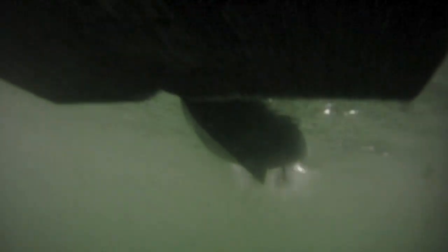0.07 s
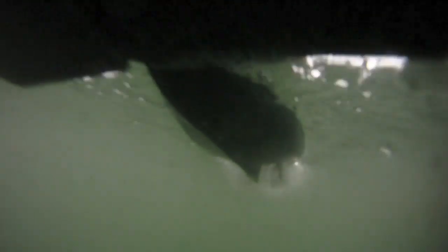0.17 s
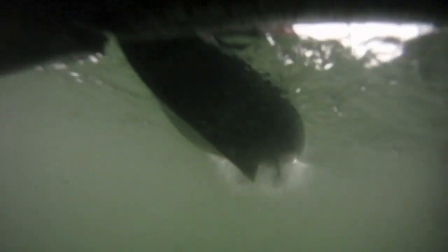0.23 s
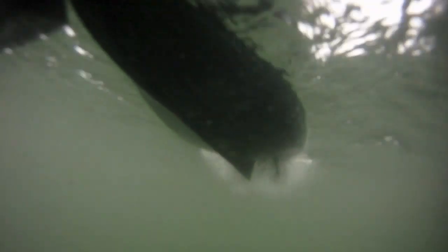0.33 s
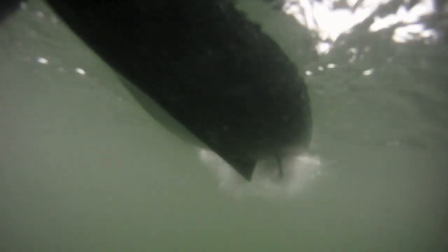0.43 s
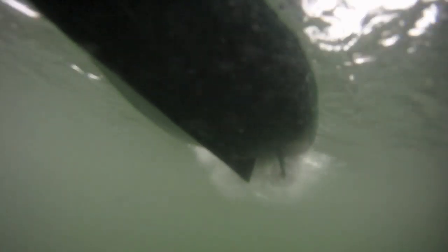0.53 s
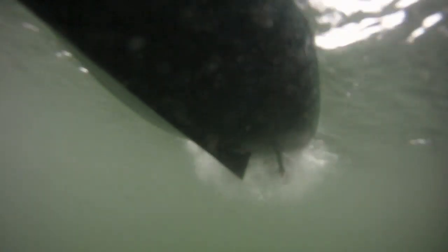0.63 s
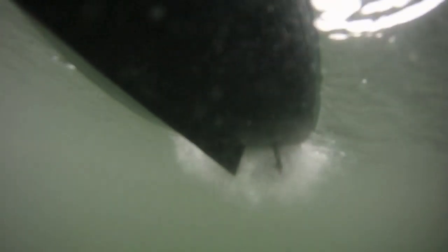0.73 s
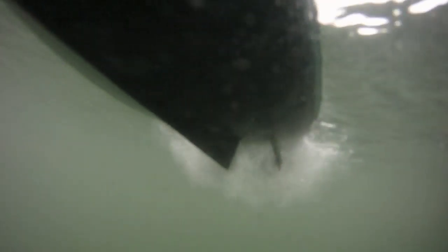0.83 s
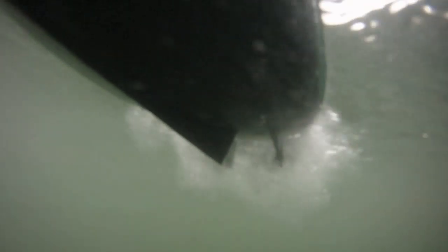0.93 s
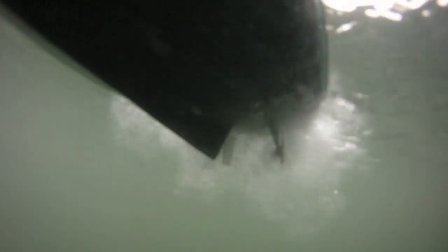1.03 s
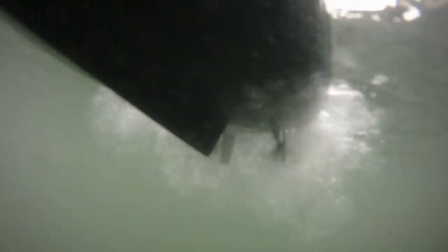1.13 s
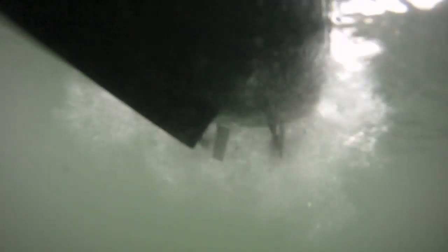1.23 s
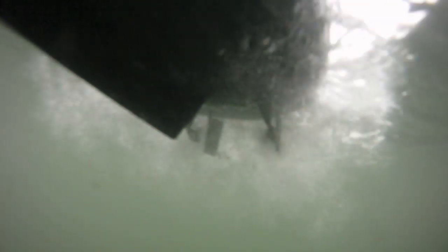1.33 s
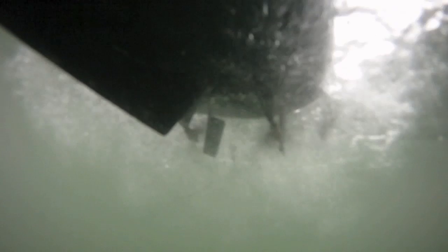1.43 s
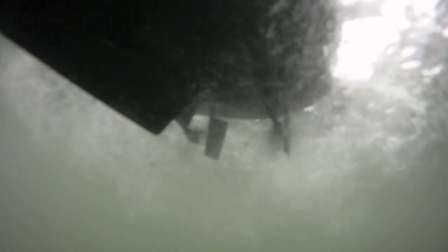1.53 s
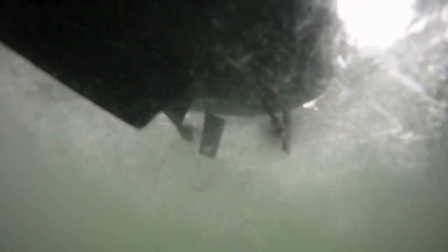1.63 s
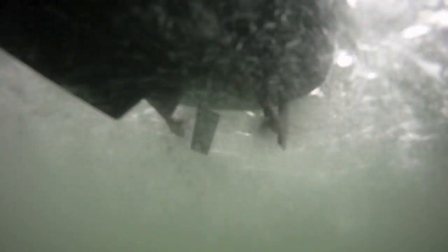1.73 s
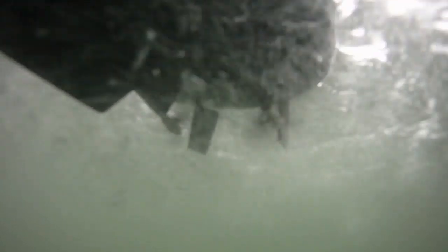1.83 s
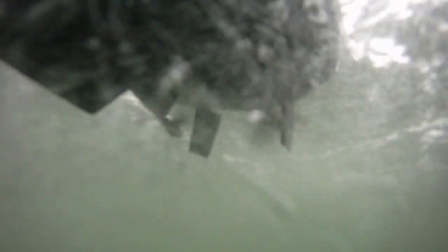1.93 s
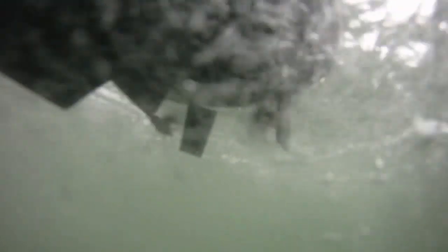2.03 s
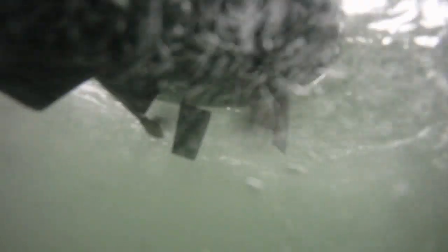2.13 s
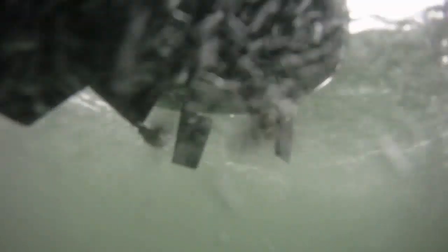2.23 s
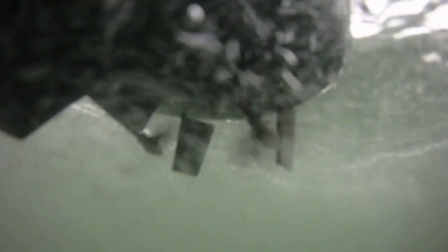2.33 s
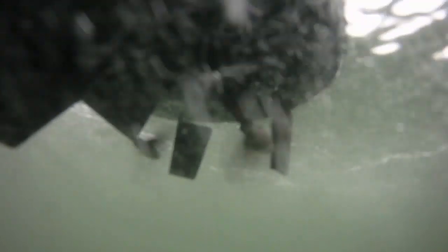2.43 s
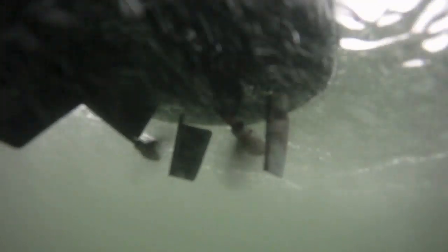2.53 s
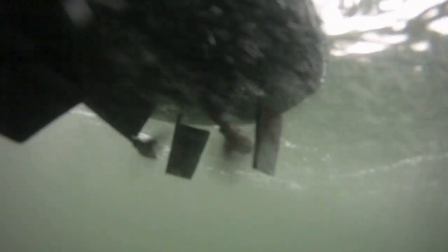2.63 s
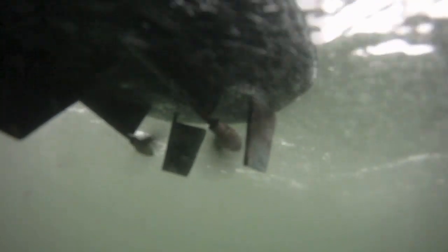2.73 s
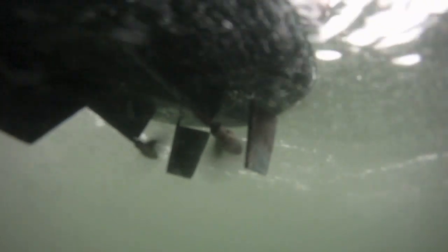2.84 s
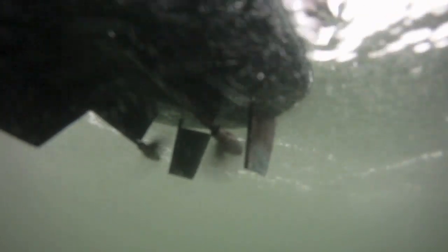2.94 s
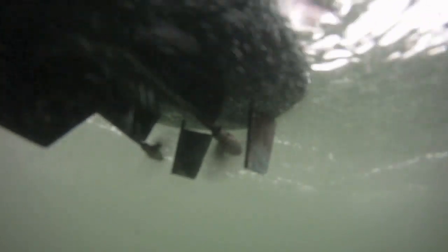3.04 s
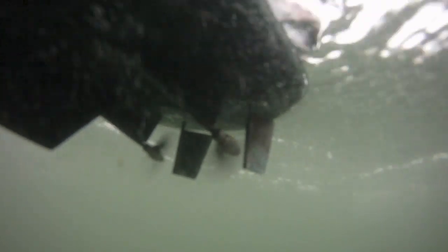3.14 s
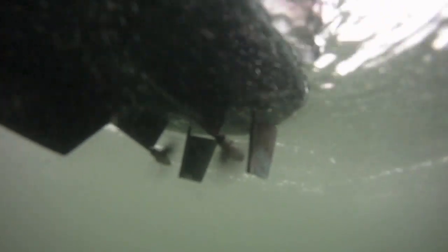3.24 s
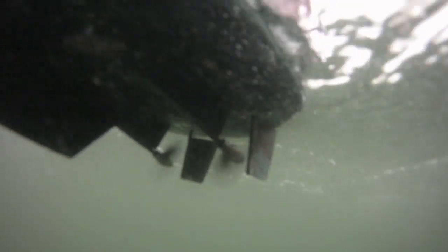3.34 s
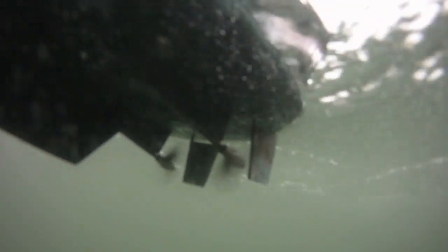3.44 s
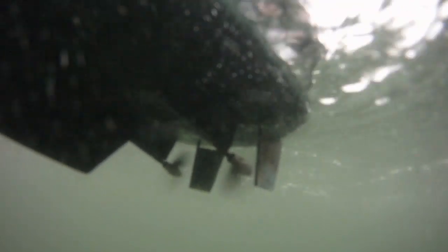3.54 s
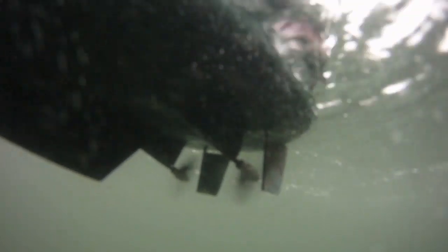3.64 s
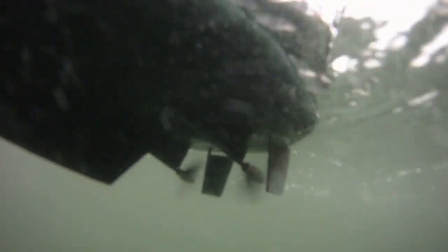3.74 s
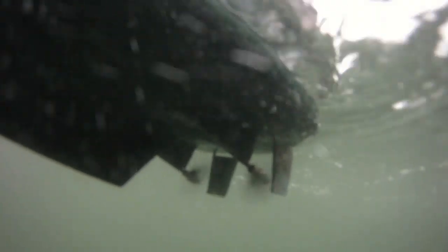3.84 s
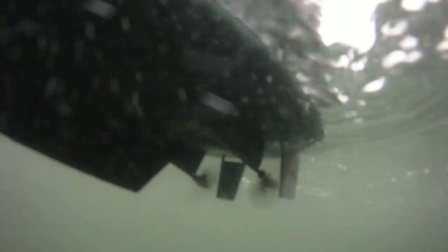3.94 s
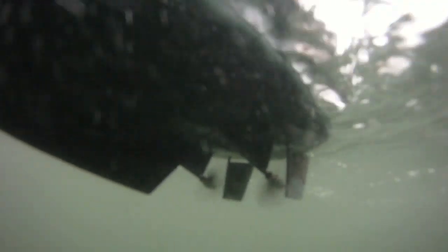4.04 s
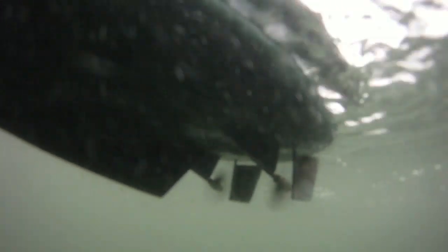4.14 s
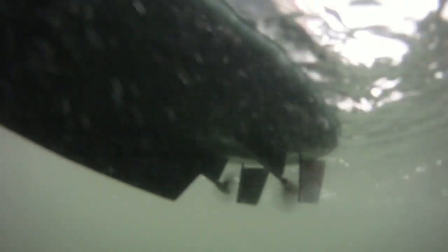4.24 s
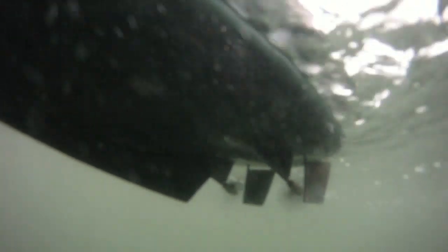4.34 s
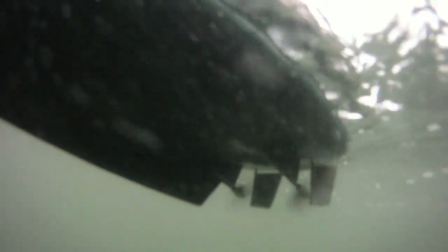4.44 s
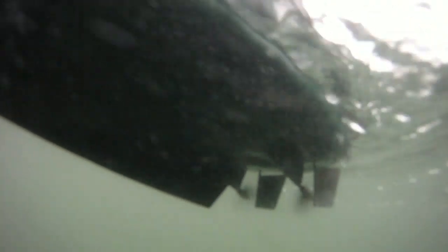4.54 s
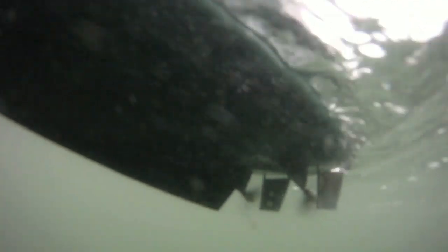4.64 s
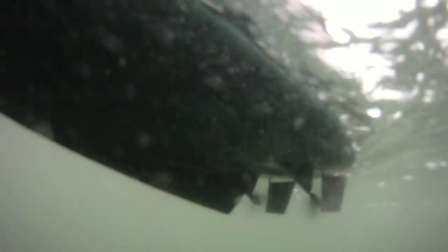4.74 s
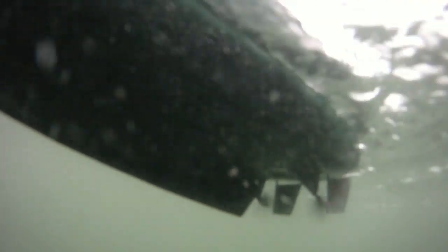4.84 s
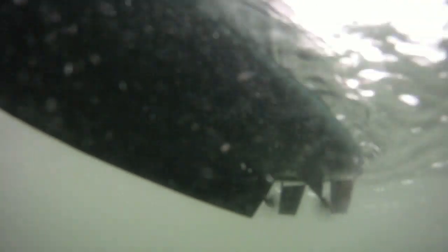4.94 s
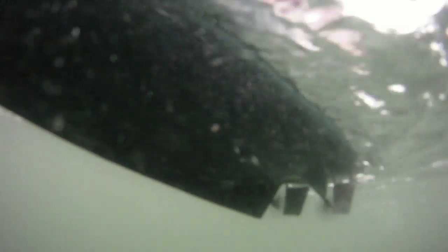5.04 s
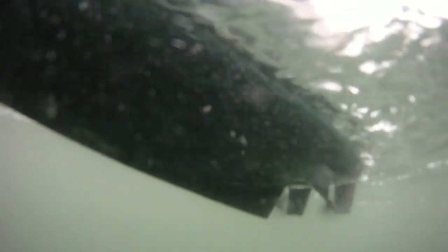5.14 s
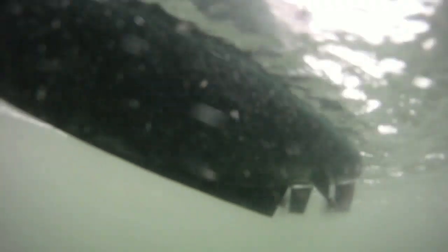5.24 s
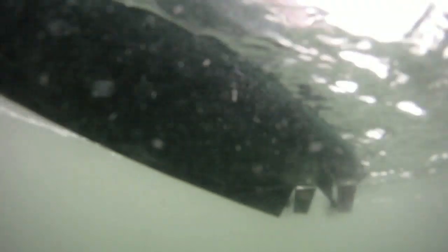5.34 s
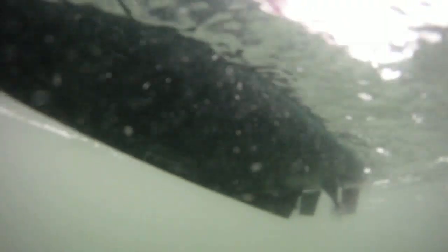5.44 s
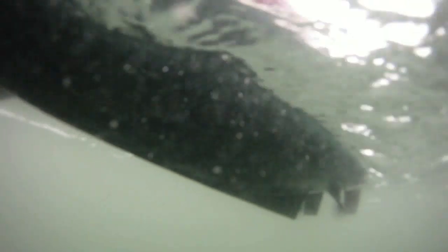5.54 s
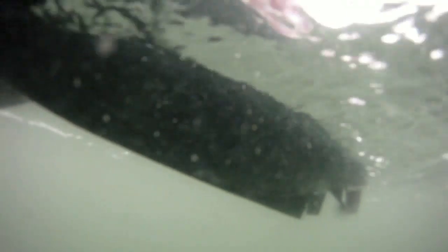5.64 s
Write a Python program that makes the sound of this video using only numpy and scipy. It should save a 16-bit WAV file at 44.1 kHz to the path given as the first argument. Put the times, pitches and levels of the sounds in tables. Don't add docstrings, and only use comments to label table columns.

```python
import sys
import numpy as np
from scipy import signal
from scipy.fft import rfft, irfft, next_fast_len
from scipy.io import wavfile
from scipy.ndimage import uniform_filter1d

SR = 44100
rng = np.random.default_rng(int(sys.argv[2]) if len(sys.argv) > 2 else 0)


def generate_wav(sig):
    pcm = np.round(np.clip(np.atleast_2d(sig).T, -1, 1) * 32767).astype(np.int16)
    wavfile.write(sys.argv[1], SR, pcm)


def to_linear_factor(level_db):
    exponent = np.asarray(level_db, float) / 20
    return 10 ** exponent


N = 250488
TIME = np.arange(N) / SR

# time in seconds, left turns per second, right turns per second.
SHAFT_SPEEDS = [(0.0, 28.798, 23.947), (0.4, 28.496, 24.144), (0.8, 28.154, 24.347), (1.2, 27.766, 24.449),
                (1.6, 27.328, 24.2), (2.0, 26.927, 23.941), (2.4, 26.72, 23.877), (2.8, 26.745, 23.894),
                (3.2, 26.856, 23.879), (3.6, 26.958, 23.901), (4.0, 27.005, 23.938), (4.4, 26.976, 23.868),
                (4.8, 26.942, 23.764), (5.2, 26.929, 23.79), (5.68, 26.941, 23.918)]
# frequency in Hz, density in dB per Hz.
GURGLE_COLOUR = [(90, -43), (140, -12), (330, 1.5), (750, -3), (1100, 1), (1400, -3.5), (1800, -31)]
RUSH_COLOUR = [(1200, -39), (1450, -14), (1600, 0.5), (1900, 4), (2600, -3), (3500, -12), (4300, -23),
               (5000, -47)]
FIZZ_COLOUR = [(3000, -7), (4000, 3), (4600, 2.5), (5100, -6.5), (5500, -17), (5900, -28)]
# frequency in Hz, width in Hz, level in dB.
LEFT_HULL_MODES = [(164, 27, -2), (220.8, 29.6, 4), (281, 40, -9.5), (383, 33, -17.5)]
RIGHT_HULL_MODES = [(234, 77, 0), (317, 49, -5.5), (366, 40, -2), (493.7, 60, 3), (662, 36, -2)]
# time in seconds, peak in dB, frequency in Hz.
GEAR_SLAPS = [(0.8534, -23.5, 2200), (1.4197, -9.5, 2210), (1.4716, -7.5, 2155), (1.5948, -8, 2260),
              (1.6646, -3, 2210), (1.721, -5.5, 2250), (1.8098, -0.5, 2360), (1.9001, -2, 2370),
              (1.9345, 1, 2330), (1.9659, 1.5, 2240), (2.0547, 0, 2156), (2.0921, -5, 2187),
              (2.2523, -1, 2197), (2.3401, -4.5, 2219), (2.3955, -6.5, 2300), (2.4653, -3.5, 2134),
              (2.5212, -5.5, 2290), (2.6469, -7.5, 2330), (3.6954, -24, 2070)]
# frequency in Hz, width in Hz, level in dB.
COUPLING_MODES = [(2070, 220, 7), (2660, 590, -8)]
DRONE_TONES_HZ = 137.1, 193
# time in seconds, nearness of the screws in dB, froth round them in dB,
# hull flank turned to the housing in dB, wake reaching it in dB.
BOAT_PASS = [(0, -37, -36, -10, -11.5), (0.251, -31, -36, -14, -6), (.5, -27, -31, -13, -7.5),
             (.8, -21, -32, -2, -8.5), (1.1, -19, -30, 0.5, -6), (1.301, -16, -25, 2, -3),
             (1.45, -6.5, -26.5, 0.5, -2.5), (1.78, -1.5, -17, -1, 0), (1.95, -5, -10.5, -10, -4.5),
             (2.302, -.5, -3.5, -12, -3.5), (2.65, -3, -4.5, -7, -5), (2.85, -10, -8, -13, -3.5),
             (3.201, -14.5, -11.5, -8.5, -6), (3.6, -22, -14.5, -8, -8), (4.2, -25, -17.5, -5, -8),
             (4.852, -29, -25.5, -5, -9), (5.301, -32, -30, -9, -16), (5.68, -25.5, -32.5, -13.5, -17.5)]
LAYER_FOLLOWS = {"left knock": (-27, 0.05, 0.08, 1.01, -0.08), "left mesh": (-22, 0.47, 0.28, -0.01, 0.07),
                 "ring": (-36, 0.54, 0.93, 0.45, -0.4), "second": (-34, 0.8, -0.1, -0.15, 0.63),
                 "fourth": (-56, 0.3, 1.5, 0.5, 0.5), "right knock": (-28, -0.05, 0.1, 0.19, 0.83),
                 "whine": (-15.5, 1.01, 0.06, -0.02, -0.03), "right mesh": (-38, -0.03, 0.34, 0.33, 0.5),
                 "tick": (-34.5, .6, -0.1, 0.2, 0.06), "gurgle": (-26.5, 0.04, 0.05, 0.04, 0.93),
                 "rush": (-22.5, 0.36, .35, 0.11, 0.21), "fizz": (-34, -0.25, 1.13, 0.18, 0.14),
                 "finest": (-52.5, -.5, 1.2, 0.3, .01), "sway": (-48, -.1, -0.08, -0.12, .6),
                 "hum": (-52, 0, -0.3, .3, 0.7), "growl": (-46, .01, 0.1, 3, 0),
                 "low note": (-40.5, 0.2, 0.4, .3, -0.5), "high note": (-39, 0.3, 0.1, -0.3, .5),
                 "grind": (-80, .01, .01, .01, .01)}
LAYER_SPELLS = {"growl": [(-.4, 0.62, -37), (.5, 1.3, -42.5), (4.7, 5.9, -55)], "low note": [(-.4, .5, -32),
                (.45, 1.16, -36)], "high note": [(-.4, 0.48, -35.5), (.45, 1.23, -40)],
                "second": [(.7, 1.6, -48)], "left mesh": [(.35, 2.2, -43), (1.51, 2.01, -31.5)],
                "tick": [(.25, 1.3, -45.5)], "right knock": [(2.2, 3.1, -40)], "ring": [(.2, .9, -55.5),
                (.7, 1.5, -53), (1.6, 1.84, -40.5), (2.0, 2.5, -36), (2.54, 2.72, -35.5),
                (2.65, 3.4, -43.5), (4.7, 6, -61.5)], "hum": [(.75, 1.35, -42), (1.4, 2.05, -38.5),
                (4.35, 5.4, -43.5)], "fizz": [(1.5, 1.68, -56), (1.83, 1.98, -44), (2.18, 2.36, -51),
                (2.36, 2.66, -40)], "right mesh": [(1.4, 1.95, -35), (2.05, 2.45, -36.5), (2.9, 5.0, -43)],
                "fourth": [(-.1, 1.4, -68), (2.18, 2.45, -49)], "finest": [(4.4, 6, -76),
                (2.48, 2.95, -46.5), (2.72, 3.43, -60)], "grind": [(5.46, 5.9, -41.5)]}
# time in seconds, length in seconds, loss in dB.
BUBBLE_CLOUDS = [
    (1.847, 0.033, 4),
    (1.96, .03, 4),
]
# time in seconds, frequency in Hz.
MESH_THIRD = [(0, 3560), (.26, 3600), (.34, 4060), (.75, 3960), (1.2, 3835), (1.72, 3500), (2.0, 3640),
              (3.3, 3772), (5.68, 3615)]

WHEEL_TEETH, PINION_TEETH = 47, 20


def right_drive(turns, left_turns):
    motor = turns * WHEEL_TEETH / PINION_TEETH
    rub = gate(motor, -0.4, 0.43) * gate(turns, -0.43, 0.19)
    thump = evened(knock(turns, -0.5, RIGHT_HULL_MODES, 2.2, -0.12, rub), 0.27, 0.055)
    mesh = level("right mesh") * wavering(WHEEL_TEETH * turns, 6.2, 0.84, even=1.0)
    whine = level("whine") * gear_whine(motor, left_turns)
    return level("right knock") * thump + slaps(whine) + mesh


def gear_whine(motor, left_turns):
    second = 2 * PINION_TEETH
    # motor order, level in dB.
    sides = [(second - 1, 0), (second + 1.2, -2.5), (second + 2, -10), (second - 3, -10), (second - 2, -7)]
    tones = sum(to_linear_factor(db) * wavering((order - 0.1) * motor, 5.1, 0.29, even=0.68) for order, db in sides)
    nearness_db = in_time(BOAT_PASS)[0]
    band_hz = 2253 + 3.0 * nearness_db
    band = wavering(np.cumsum(band_hz) / SR, 113.0, 0, even=0.6)
    throb = gate(motor, 0.057, 0.85) * gate(left_turns, 0.04, 0.07)
    return evened(to_linear_factor(-0.5) * rms_one(tones) + throb * band, 0.097, 0.2)


def slaps(whine):
    rung, whine_share = np.zeros(N), np.ones(N)
    t = np.arange(600) / SR
    onset = np.sin(np.clip(t / 0.0015, 0, 1) * np.pi / 2) ** 2
    swell = np.exp(-((t - 0.003) / 0.003) ** 2) * onset
    for s, peak_db, hz in GEAR_SLAPS:
        i = round(s * SR)
        rung[i:i + 600] += to_linear_factor(peak_db - 3.0) * swell * np.sin(2 * np.pi * hz * t)
        whine_share[i - 200:i + 400] *= 1 - 0.75 * np.hanning(600)
    return whine_share * whine + rung


def left_drive(turns):
    thump = knock(turns, 0.1, LEFT_HULL_MODES, 0.71, -1.0, gate(turns, 1.0, 0.16))
    thump = evened(thump, 1.0, 0.077)
    bind = rms_one(1 + 1.04 * np.cos(2 * np.pi * (turns + 0.2)))
    teeth = wavering(WHEEL_TEETH * turns, 3.34, 0.59, even=0.65)
    teeth = teeth + to_linear_factor(-14) * wavering((WHEEL_TEETH + 1) * turns, 7.2, 0.99)
    scrape = to_linear_factor(-5) * resonate(bind * rng.standard_normal(N), [(1206, 44, 0)])
    mesh = evened(bind * teeth + scrape, 1.0, 0.074)
    return level("left knock") * thump + level("left mesh") * mesh + left_overtones(turns)


def left_overtones(turns):
    ring_cycles = np.cumsum(in_time(MESH_THIRD)[0]) / SR
    ring = gate(turns, -0.13, 0.95) * wavering(ring_cycles, 150.0, 0, even=0.45)
    second = gate(turns, 0.017, 0.6) * wavering(2 * WHEEL_TEETH * turns, 75.0, 0.05, even=0.6)
    fourth = gate(turns, -0.37, 0.34) * wavering(4 * WHEEL_TEETH * turns, 80.0, 0, even=0.27)
    return level("ring") * ring + level("second") * second + level("fourth") * fourth


def coupling(turns):
    struck = np.diff(np.floor(turns - 0.03), prepend=0) > 0
    blows = struck * to_linear_factor(1.5 * rng.standard_normal(N))
    return level("tick") * resonate(resonate(blows, COUPLING_MODES), COUPLING_MODES[:1])


def hull_notes():
    low_hz, upper_hz = DRONE_TONES_HZ
    hum = level("hum") * wavering(940.0 * TIME, 22.0, 0.55, even=0.5)
    growl = level("growl") * wavering(low_hz * TIME, 24.0, 0.095, even=0.98)
    low = level("low note") * wavering(upper_hz * TIME, 3.95, 0.12, even=1.0)
    high_hz = 329.5 - 16 * (TIME > 1.6)
    high = level("high note") * wavering(np.cumsum(high_hz) / SR, 5.1, 0.66, even=0.92)
    grind = level("grind") * wavering(1205 * TIME, 60.6, 0, even=0.46)
    return hum + growl + low + high + grind


def water(left_turns, right_turns):
    stir = gate(left_turns, 0.15, 0.31) * gate(right_turns, 0, 0.026)
    gurgle = level("gurgle") * coloured(GURGLE_COLOUR, 1.0, count=6)
    rush = level("rush") * coloured(RUSH_COLOUR, 1.7, count=7)
    shed = gate(left_turns, -0.05, 0.55)
    fizz = level("fizz") * coloured(FIZZ_COLOUR, 2.5, count=5)
    finest_colour = [(5000, -20), (5350, 2), (5650, -3), (5950, -1), (6050, -35)]
    finest = level("finest") * coloured(finest_colour, 1.9)
    sway_colour = [(15, -7), (28, -3.5), (42, -11.5), (60, -2.5), (80, -6.5), (105, -19.5), (130, -27)]
    sway = level("sway") * evened(coloured(sway_colour, 0.3), 0.95, 0.092)
    shaft_rate = to_linear_factor(-54) * np.sin(2 * np.pi * left_turns)
    return stir * (gurgle + rush) + shed * (fizz + finest) + sway + shaft_rate


def bubble_muffle():
    loss_db = sum(db * np.exp(-(2 * (TIME - s) / length_s) ** 2) for s, length_s, db in BUBBLE_CLOUDS)
    return to_linear_factor(-loss_db)


def knock(turns, at, modes, uneven_db, rub_db, rub):
    struck = np.diff(np.floor(turns - at), prepend=0) > 0
    blows = rms_one(struck * to_linear_factor(uneven_db * rng.standard_normal(N)))
    rung = resonate(blows + to_linear_factor(rub_db) * rub * rng.standard_normal(N), modes)
    low_cut = signal.butter(6, 145, "high", fs=SR, output="sos")
    return rms_one(signal.sosfilt(low_cut, rung))


def level(name):
    top_db, *shares = LAYER_FOLLOWS[name]
    t = TIME[::64]
    s, *controls = np.transpose(BOAT_PASS)
    gain = to_linear_factor(top_db + np.interp(t, s, np.dot(shares, controls)))
    for start, end, db in LAYER_SPELLS.get(name, []):
        edge_s = 0.34 * (end - start)
        rise = np.clip(np.minimum(t - start, end - t) / edge_s, 0, 1)
        gain = gain + to_linear_factor(db) * np.sin(rise * np.pi / 2) ** 2
    ripple_db = 0.78 * drift(5.4)[::64]
    return np.interp(TIME, t, gain * to_linear_factor(ripple_db))


def wavering(cycles, width_hz, steady, even=0.19):
    steady = np.clip(steady, 0, 1)
    wander = (drift(width_hz) + 1j * drift(width_hz)) / np.sqrt(2)
    wander = wander / (np.abs(wander) + 1e-9) ** np.clip(even, 0, 1)
    height = np.sqrt(steady) + np.sqrt(1 - steady) * wander
    return rms_one(np.real(height * np.exp(2j * np.pi * cycles)))


def coloured(spectrum, patchy_db, count=1):
    hz, db = np.transpose(spectrum)
    size = next_fast_len(N)
    octave = np.log2(np.arange(size // 2 + 1) * SR / size + 1)
    colour = to_linear_factor(np.interp(octave, np.log2(hz), db, left=-80, right=-80))
    noise = colour * rfft(rng.standard_normal(size))
    place = np.interp(octave, np.log2(hz[[0, -1]]), [0, count - 1])
    out = 0
    for k in range(count):
        band = irfft(noise * np.clip(1 - abs(place - k), 0, 1), size)[:N]
        out = out + band * to_linear_factor(patchy_db * drift(6.6))
    return rms_one(out)


def resonate(x, modes):
    out = 0
    for k, (hz, width_hz, db) in enumerate(modes):
        r = np.exp(-np.pi * width_hz / SR)
        b = [(1 - r * r) / 2, 0, (r * r - 1) / 2]
        a = [1, -2 * r * np.cos(2 * np.pi * hz / SR), r * r]
        out = out + (-1) ** k * to_linear_factor(db) * signal.lfilter(b, a, x)
    return rms_one(out)


def gate(turns, peak_at, sharp):
    return rms_one(np.exp(sharp * np.cos(2 * np.pi * (turns - peak_at))))


def evened(x, share, span_s):
    loudness = np.sqrt(uniform_filter1d(x ** 2, round(span_s * SR)) + 1e-12)
    return rms_one(x / loudness ** np.clip(share, 0, 1))


def drift(rate_hz):
    r = np.exp(-32 * np.pi * rate_hz / SR)
    slow = signal.lfilter([1], [1, -2 * r, r * r], rng.standard_normal(N // 16 + 3002))
    slow = slow[3000:]
    return np.interp(np.arange(N) / 16, np.arange(len(slow)), rms_one(slow))


def in_time(rows):
    s, *columns = np.transpose(rows)
    return [np.interp(TIME, s, c) for c in columns]


def rms_one(x):
    return x / np.sqrt(np.mean(x ** 2) + 1e-20)


def scene():
    turns = np.cumsum(in_time(SHAFT_SPEEDS), axis=1) / SR
    left, right = turns - turns[:, [round(3.0 * SR)]]
    boat = right_drive(right, left) + left_drive(left) + coupling(left) + hull_notes()
    return (bubble_muffle() * (boat + water(left, right)))[None]


def top_cut(x):
    return signal.sosfilt(signal.butter(12, 15710, fs=SR, output="sos"), x)


def record(dry):
    rounded = 1.5 * np.tanh(dry / 1.5)
    cut = signal.sosfilt(signal.cheby2(10, 22, 6050, fs=SR, output="sos"), rounded)
    coarse = signal.resample_poly(cut, 40, 147, axis=1)
    held = np.repeat(coarse, 4, axis=1)
    held = signal.resample_poly(held, 147, 160, axis=1)
    held = signal.sosfilt(signal.cheby2(10, 40, 15800, fs=SR, output="sos"), held)
    return top_cut(held[:, :N])


dry = scene()
out = record(dry)
generate_wav(out)
```